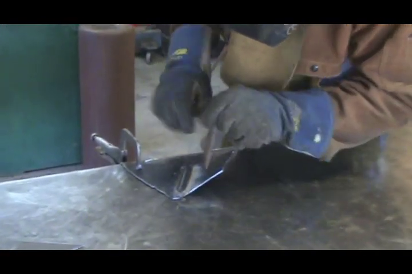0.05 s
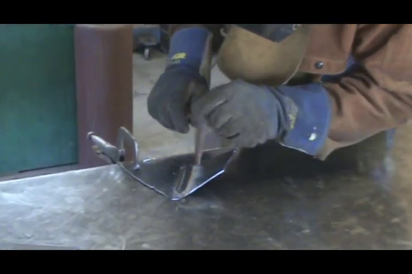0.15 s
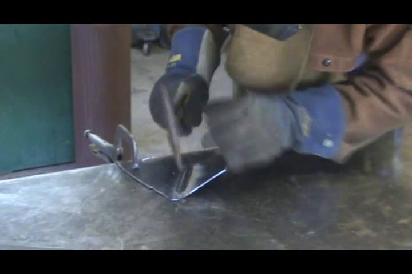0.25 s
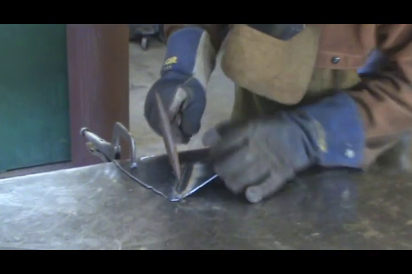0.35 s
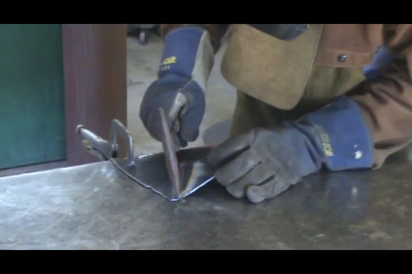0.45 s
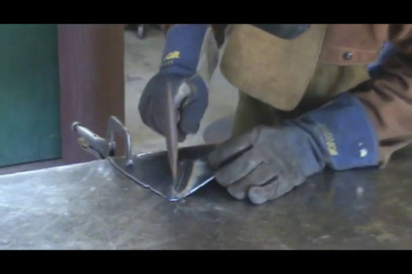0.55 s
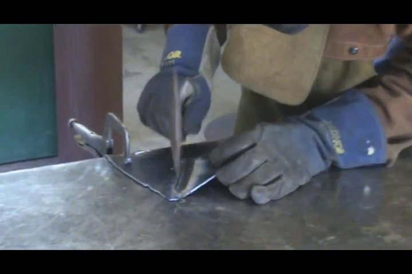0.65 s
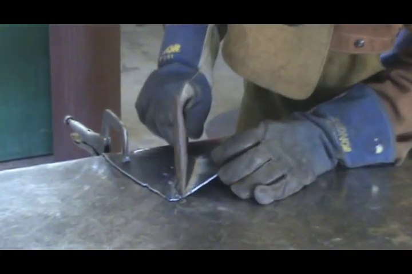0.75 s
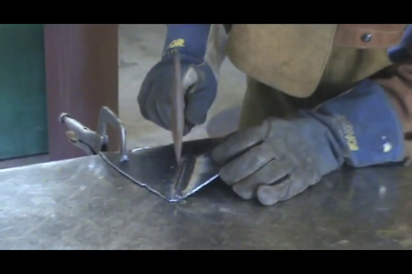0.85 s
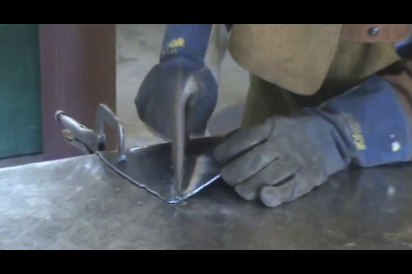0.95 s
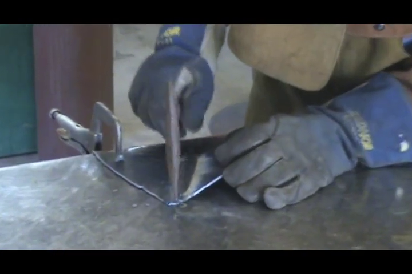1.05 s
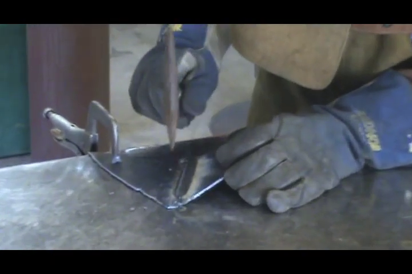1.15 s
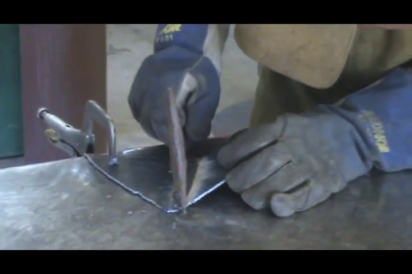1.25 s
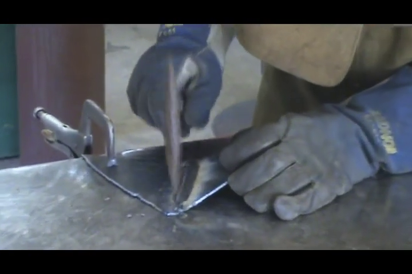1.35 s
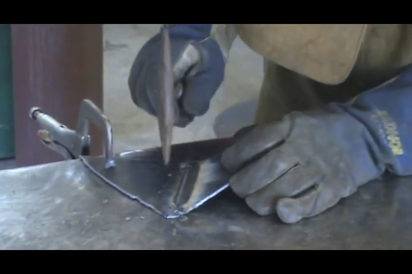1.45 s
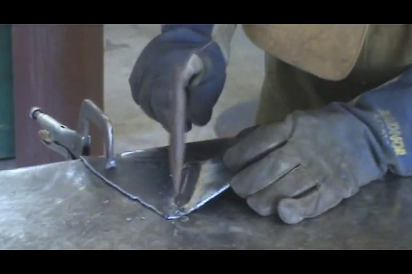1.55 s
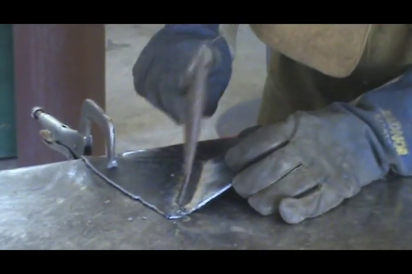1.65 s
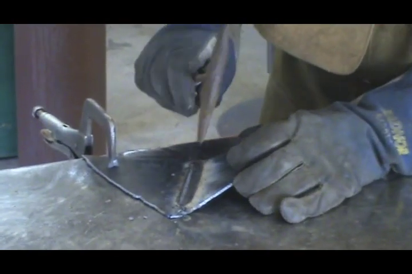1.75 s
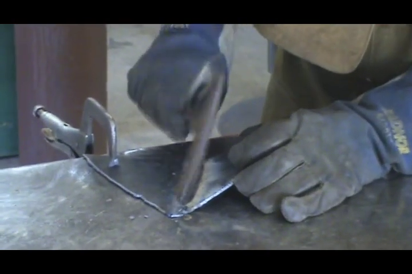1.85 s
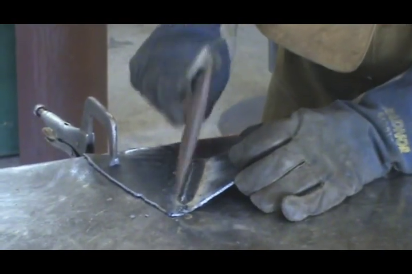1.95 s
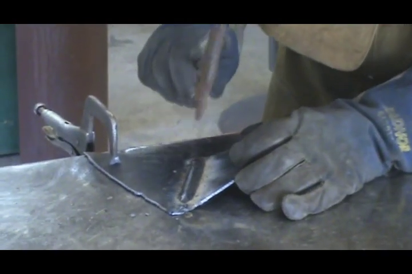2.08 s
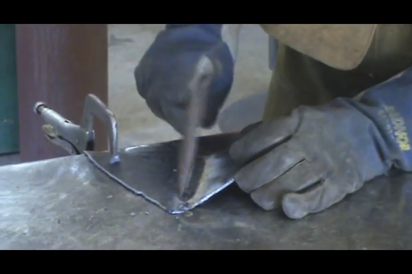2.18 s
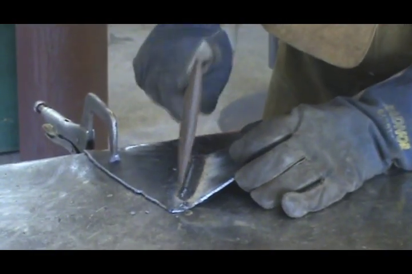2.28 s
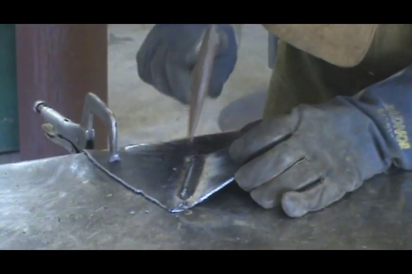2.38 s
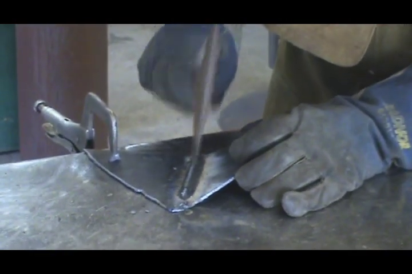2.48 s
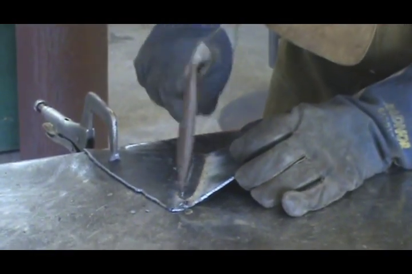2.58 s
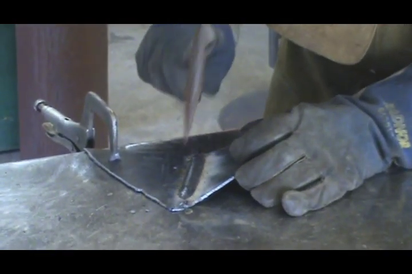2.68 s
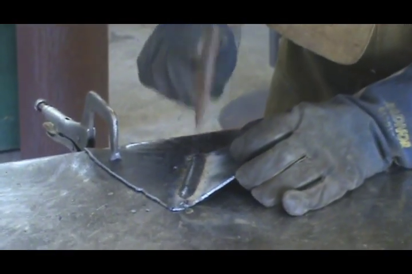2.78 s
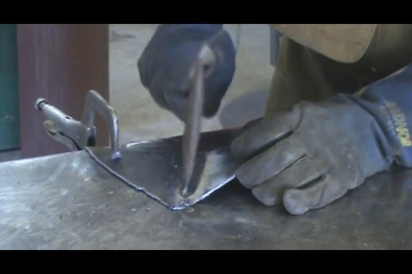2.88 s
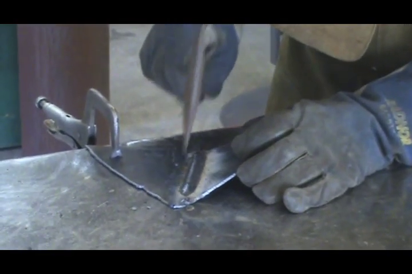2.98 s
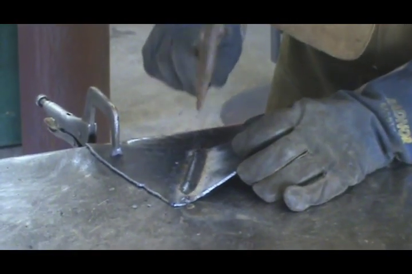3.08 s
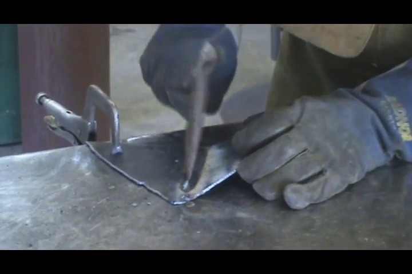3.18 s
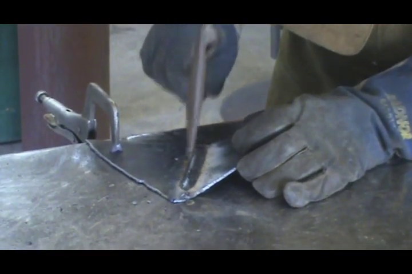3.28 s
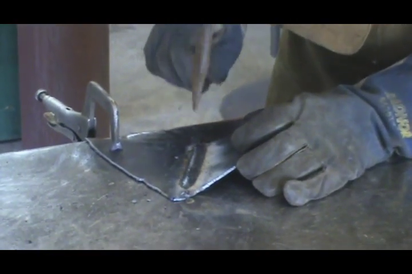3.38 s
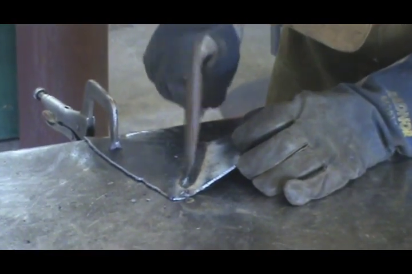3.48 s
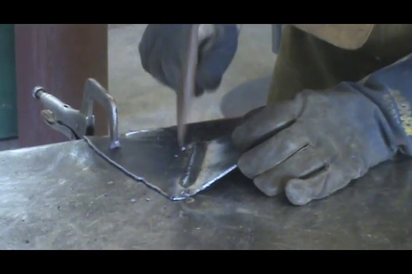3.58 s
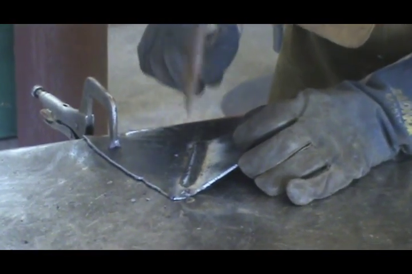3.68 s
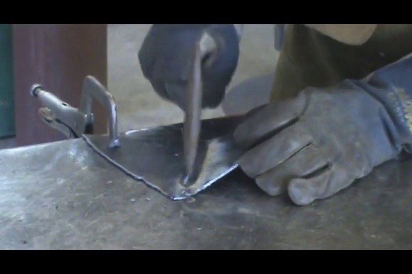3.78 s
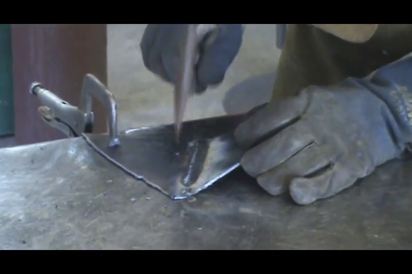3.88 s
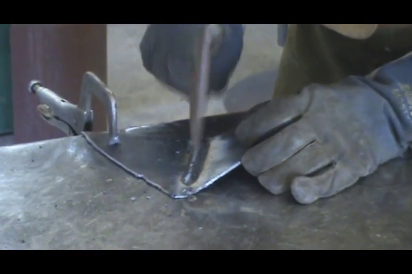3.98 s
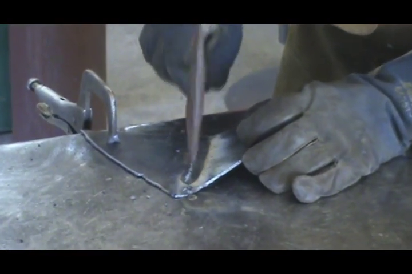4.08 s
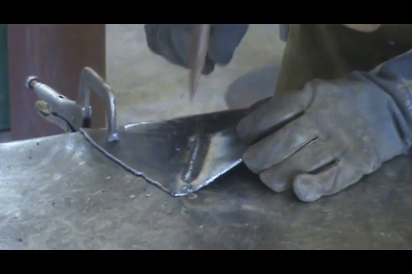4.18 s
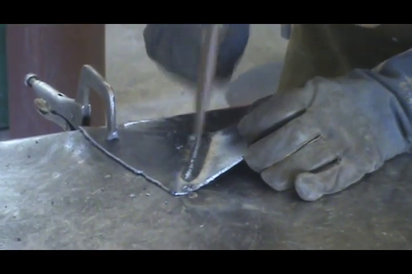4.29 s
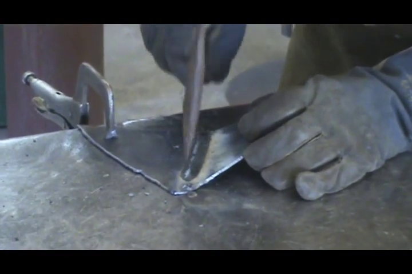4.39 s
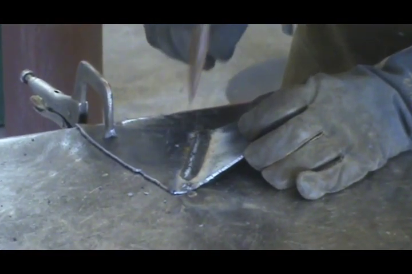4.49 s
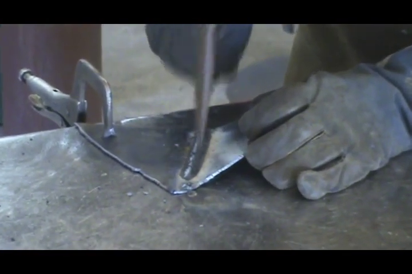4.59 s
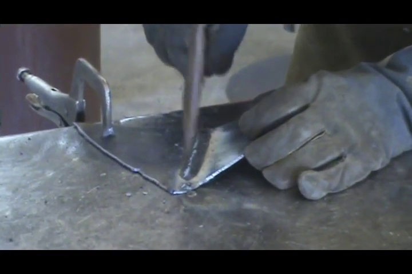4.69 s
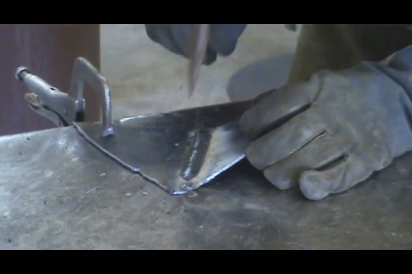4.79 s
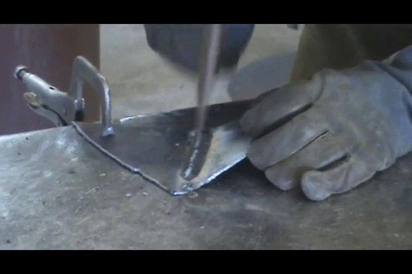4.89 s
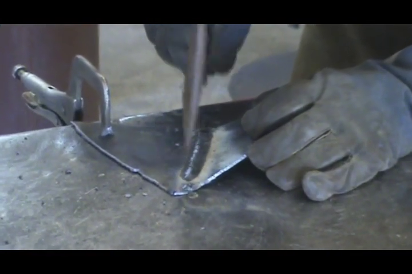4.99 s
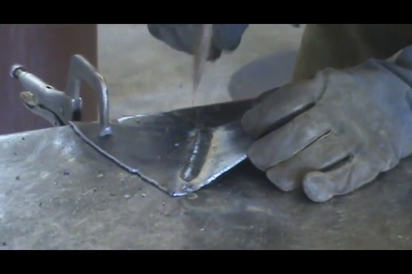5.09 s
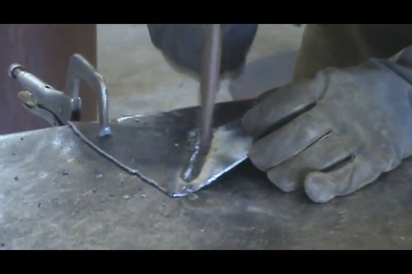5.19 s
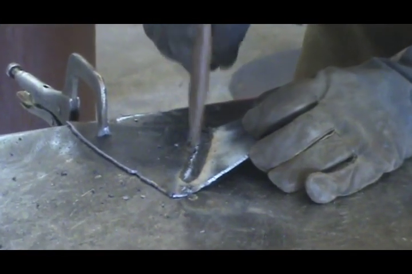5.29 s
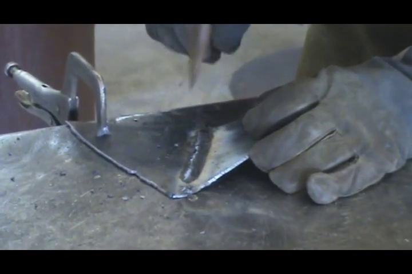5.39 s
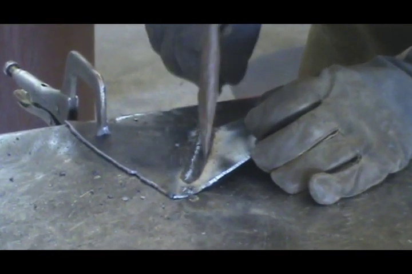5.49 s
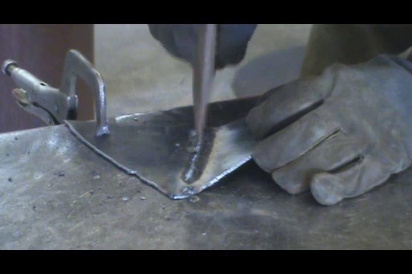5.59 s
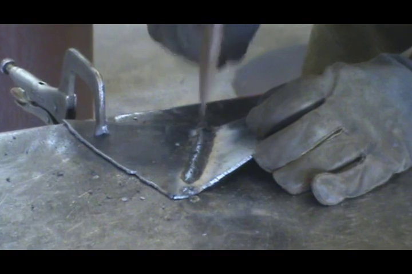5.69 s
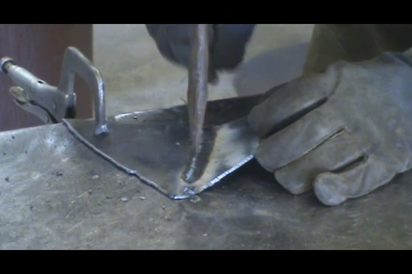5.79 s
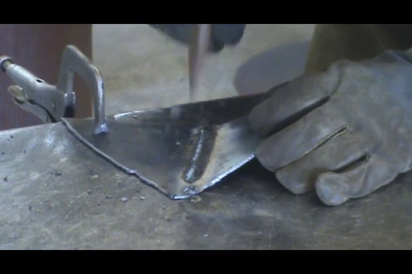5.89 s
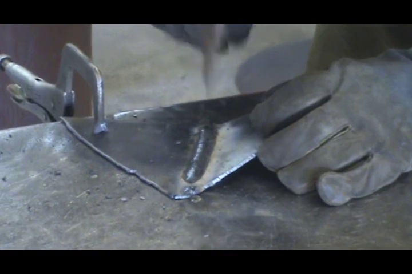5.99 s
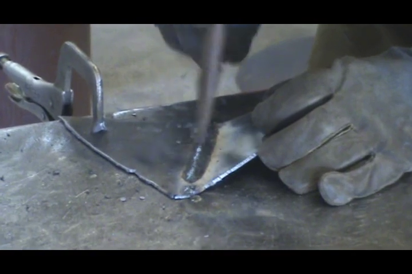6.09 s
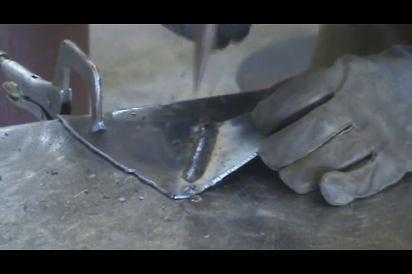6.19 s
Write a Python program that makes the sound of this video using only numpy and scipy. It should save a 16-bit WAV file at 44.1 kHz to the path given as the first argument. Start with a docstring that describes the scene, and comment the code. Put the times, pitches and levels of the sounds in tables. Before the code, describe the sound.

Hard, bright hammer blows clank about three times a second on a loose steel plate, each ringing on through a workshop bench.

```python
"""Steel rings faintly over workshop air, gloves and hammer shuffle into place, then a hammer chips slag off a weld.
The steel plate lies loose on a steel workbench, held by hand. Each blow is a short clank of dying sines and crackling
noise; plate, bench and workshop ring on as noise shaped band by band plus clear dying sines. Handling is small knocks
and grainy noise slides. A limiter ducks at loud clanks and recovers steadily, so the ringing swells after the blow."""
import sys
import numpy as np
from scipy import signal
from scipy.fft import rfft, irfft
from scipy.io import wavfile
from scipy.ndimage import uniform_filter1d

SR = 44100
rng = np.random.default_rng(int(sys.argv[2]) if len(sys.argv) > 2 else 0)


def unload_wav(signal):
    """Save mono or channel-first audio to the path in sys.argv[1] as 16-bit WAV at rate SR, clipped to [-1, 1]."""
    wavfile.write(
        sys.argv[1],
        SR,
        np.round(np.clip(np.atleast_2d(signal).T, -1, 1) * 32767).astype(np.int16),
    )


N = 275625


def amp(db):
    """Turns decibels into gain."""
    return 10 ** (np.asarray(db) / 20)


def unit(x):
    """Scales a signal to rms 1."""
    return x / np.sqrt(np.mean(x ** 2) + 1e-20)


def read(points, hz):
    """Reads a table along a log-frequency axis."""
    f, value = np.transpose(points)
    return np.interp(np.log(hz + 1), np.log(f + 1), value)


def add(mix, start_s, sound):
    """Mixes a sound in at its start time."""
    part = mix[max(round(start_s * SR), 0):][:len(sound)]
    part += sound[:len(part)]


def noise(length):
    """Makes white noise."""
    return rng.standard_normal(length)


def colour(x, spectrum):
    """Gives white noise a spectrum, at rms 1."""
    hz = np.fft.rfftfreq(len(x), 1 / SR)
    return unit(irfft(rfft(x) * amp(read(spectrum, hz)), len(x)))


def wobble(length, size):
    """Makes a smooth random curve of rms 1 by averaging noise over size samples."""
    return unit(uniform_filter1d(noise(length), size=size))


def tone(hz, bass_db, treble_db, bass_hz=1150, treble_hz=5000):
    """Two shelves: a blow cushioned by slag is dull, one on bare steel is bright."""
    bass = 1 / (1 + (hz / bass_hz) ** 4)
    treble = 1 - 1 / (1 + (hz / treble_hz) ** 4)
    return amp(bass_db * bass + treble_db * treble)


def modes(table, t, spot, bass_db, treble_db, scatter_db, detune, phase_spread):
    """Dying sines mixed by the spot that is struck; the holding hand changes level and tuning a little."""
    hz, tip_db, t60, gained_db = np.transpose(table)[:, :, None]
    size, shift, phase = rng.standard_normal((3, len(hz), 1))
    cycles = hz * (1 + detune * shift) * t + phase_spread * phase
    angle = np.float32(2 * np.pi * cycles)
    fade = np.exp(np.float32(-np.log(1000) / t60 * t))
    gain = amp(tip_db + spot * gained_db + scatter_db * size) * tone(hz, bass_db, treble_db)
    return (gain * (fade * np.sin(angle))).sum(0)


def bench_pattern():
    """The part of the response of bench and room that all blows share, as 0.75 s of noise."""
    return noise(SR * 3 // 4)


# Crowded modes of plate and bench heard through the workshop: [f/Hz, relative level/dB per Hz]
RING_SPECTRUM = [(60, -79), (170, -38), (280, -16), (450, -7), (920, 3), (1200, 1), (1500, -1), (2300, 1),
                 (4800, -4), (6000, -8), (8000, -13.5), (10800, -21.5), (12500, -31.5)]
# Time in which the crowded modes die away by 60 dB: [f/Hz, t60/s]
RING_DECAY = [(200, 0.45), (530, 0.43), (1000, 0.34), (1800, 0.38), (3700, 0.41), (7000, 0.36),
              (12000, 0.3)]
# Bands where the plate's modes bunch up or thin out: [centre f/Hz, width/Hz, level/dB]
MODE_BUNCHES = [(3950, 160, -3), (6100, 300, -3.5), (6800, 330, 4), (7380, 130, -6), (7620, 90, 4),
                (11720, 170, 5)]
# Build-up time constant (s) up to 1 kHz; above, shorter bending waves travel faster and build up sooner
SPREAD_S, SPREAD_SLOPE = 0.016, 0.83


def dense_ring(pattern, bass_db, treble_db):
    """Crowded modes as noise that builds and dies band by band; long waves repeat more between blows."""
    n = len(pattern)
    t, hz = np.arange(n) / SR, np.fft.rfftfreq(n, 1 / SR)
    alike = read([(700, .5), (3000, .3)], hz)
    mixed = alike * rfft(pattern) + np.sqrt(1 - alike ** 2) * rfft(noise(n))
    bunch_db = sum(db * np.exp(-((hz - centre) / width) ** 2) for centre, width, db in MODE_BUNCHES)
    # each blow favours other groups of modes
    favour_db = 2.0 * wobble(len(hz), size=50)
    dense = colour(irfft(mixed * amp(bunch_db + favour_db), n), RING_SPECTRUM)

    band_hz, age, bands = signal.stft(dense, SR, nperseg=512)
    t60 = read(RING_DECAY, band_hz)[:, None]
    spread_s = SPREAD_S * (1000 / np.maximum(band_hz, 1000)) ** SPREAD_SLOPE
    fade = np.exp(-np.log(1000) * age / t60)
    build = 1 - np.exp(-age / spread_s[:, None])
    bands = bands * tone(band_hz, bass_db, treble_db)[:, None] * fade * build
    # the loose plate chatters on the bench while it still swings hard
    chatter = amp(1.3 * wobble(n, size=220) * np.exp(-t / .15))
    return signal.istft(bands, SR)[1][:n] * chatter


# Clear modes of the bench top: [f/Hz, level at the plate's tip/dB, t60/s, level gained at mid-weld/dB]
BENCH_MODES = [(370, -22, .7, 0), (447, -19, .5, 0), (478, -19, 1.7, -9), (513, -13, .5, 0),
               (592, -18, .5, 0), (738, -10, .42, 0), (900, 0, .3, -1), (921, 6.5, .33, 0),
               (957, 1, .31, -3), (993, -1, .36, -3), (1029, -6, .45, 0), (1109, -8, .45, 0),
               (1210, -4, .45, -4), (1332, -2, .5, -7), (1643, -9, .45, 0), (1826, -8, .4, 0),
               (1905, -10, .4, 3), (2090, -6, .4, -3), (2409, -8, .4, 0), (2509, -7, .45, 0),
               (2970, -4, .58, -6), (3526, -8, .38, 3), (4405, -9, .36, 4), (4580, -10, .34, 4),
               (6933, -11, .38, 0), (7640, -15, .33, 4), (8855, -20, .35, 0)]


def ring(pattern, bass_db, treble_db, spot=0, dense_db=3, clear_db=-10.5, build_s=0.019):
    """Plate, bench and room ring on: a dense wash of crowded modes with clear bench tones in it."""
    t = np.arange(len(pattern)) / SR
    dense = dense_ring(pattern, bass_db, treble_db)
    clear = modes(BENCH_MODES, t, spot, bass_db, treble_db, scatter_db=2.5, detune=.002, phase_spread=.12)
    build = 1 - np.exp(-t / build_s)
    return amp(dense_db) * dense + amp(clear_db) * clear * build


# Workshop air: [f/Hz, relative level/dB per Hz]
AIR_SPECTRUM = [(25, -19), (90, -28), (200, 0), (450, 2), (900, 1), (2200, -5), (5000, -10.5),
                (12000, -17.5)]


def workshop_air(level_db=-48):
    """The air of the workshop: steady coloured noise."""
    return amp(level_db) * colour(noise(N), AIR_SPECTRUM)


# Hammer head and plate at the contact: [f/Hz, level at the plate's tip/dB, t60/s, level gained at mid-weld/dB]
CLANK_MODES = [(70, -58, 0.05, 21), (746, -9.5, 0.067, -4), (1071, -1, 0.06, -2.5), (1297, -2.5, 0.064, -2),
               (1881, 0, 0.039, 6.5), (2020, 4, 0.023, -0.5), (2330, -0.5, 0.038, 4.5),
               (3512, -6.5, 0.045, 5.5), (4590, -13, 0.093, 9), (6630, -19, 0.071, 12),
               (7700, -12.5, 0.081, 6.5), (8050, -1, 0.061, -4.5), (9460, -18, 0.031, 11.5),
               (11500, -28, 0.032, 12)]
# Slag cracking under the point: [f/Hz, relative level/dB per Hz]
CRACK_SPECTRUM = [(30, -61), (300, -31), (700, -22), (1500, -3), (2200, 1), (5000, 1.5), (6000, -4.5),
                  (8200, -8), (10500, -11.5), (12500, -22.5)]


def clank(treble_db, spot=0, modes_db=-6, crack_db=-2, crack_s=0.0061, rise_s=0.00073):
    """Direct sound of the contact: quickly damped steel modes and a burst of cracking slag."""
    t = np.arange(SR // 10) / SR
    steel = modes(CLANK_MODES, t, spot, 0, treble_db, scatter_db=1.5, detune=.003, phase_spread=1)
    grit = colour(noise(len(t)), CRACK_SPECTRUM)
    shelf = tone(np.fft.rfftfreq(len(t), 1 / SR), 0, treble_db)
    grit = irfft(rfft(grit) * shelf, len(t)) * np.exp(-t / crack_s)
    rise = 1 - np.exp(-t / rise_s)
    return (amp(modes_db) * steel + amp(crack_db) * grit) * rise


# Light knocks as the tool is taken up: [t/s, level/dB, treble level/dB, ring level over the knock/dB]
TOOL_KNOCKS = [(.091, -23.5, -9, -25), (.175, -28, -5, -28), (.586, -28, -20, -22)]


def handling(pattern, settle_db=-29, settle_ago_s=0.031, damping_s=0.0035):
    """The bench still rings from an earlier bump; small knocks follow as hand and hammer find their place."""
    out = np.zeros(N)
    bump = ring(pattern, bass_db=6, treble_db=-27, spot=1)
    add(out, 0, amp(settle_db) * bump[round(settle_ago_s * SR):])
    for start_s, db, treble_db, ring_db in TOOL_KNOCKS:
        tick = clank(treble_db)
        # the point stays on the steel and damps the knock
        damping = np.exp(-np.arange(len(tick)) / SR / damping_s)
        add(out, start_s, amp(db) * tick * damping)
        add(out, start_s, amp(db + ring_db) * ring(pattern, 0, treble_db))
    return out


# Hiss of a slide: [f/Hz, relative level/dB per Hz]
HISS_SPECTRUM = [(1000, -9), (2500, -1.5), (4500, -1), (7000, -4), (10000, -9), (12500, -13)]
# Duller rub of a slide: [f/Hz, relative level/dB per Hz]
BODY_SPECTRUM = [(80, -3), (220, 1.5), (450, -10), (1000, -7), (2000, -0.5), (3500, -9), (8000, -35)]
# Short slides of glove and hammer over the steel:
# [t of firmest pressure/s, swell/s, fade/s, hiss level/dB, body level over the hiss/dB]
HAND_SLIDES = [(0.199, 0.013, 0.056, -41.5, -1), (0.393, 0.035, 0.013, -42.5, -5),
               (0.623, 0.0049, 0.04, -45, -3), (0.705, 0.028, 0.045, -37, -15),
               (0.795, 0.028, 0.051, -53.5, 9.5)]


def sliding(grain_db=2.0):
    """Each slide swells as the hand presses and fades as it eases off: a grainy hiss and a duller rub."""
    t = np.arange(N) / SR
    hiss = colour(noise(N), HISS_SPECTRUM)
    body = colour(noise(N), BODY_SPECTRUM)
    catches = unit(amp(grain_db * wobble(N, size=180)))  # leather sticks and slips
    out = np.zeros(N)
    for peak_s, swell_s, fade_s, db, body_db in HAND_SLIDES:
        pressure = np.exp(-np.maximum((peak_s - t) / swell_s, (t - peak_s) / fade_s))
        out += amp(db) * pressure * (hiss + amp(body_db) * body)
    return out * catches


def crush(lead_s):
    """The point sinks through the slag for an instant before it meets steel: a rising scrap of noise."""
    rise = np.linspace(0, 1, max(round(lead_s * SR), 16))
    return colour(noise(len(rise)), RING_SPECTRUM) * rise


# Hammer blows: [t/s, force level/dB, clank level over the force/dB, contact brightness/dB]
HAMMER_BLOWS = [(0.9285, 2.5, 0.7, 6), (1.2013, 2, 1.5, -1), (1.4747, -4.5, 0.8, 4),
                (1.7961, -19.5, 5.5, -8.5), (2.0879, -1.5, 2, 7), (2.407, -1.5, 2, 1), (2.7555, 0, -1, 3),
                (3.0736, 0.8, -4, 6), (3.3982, -10, 1.5, -3.5), (3.6991, -0.7, -1.5, 6.5),
                (3.9849, -5, -1.4, 4), (4.2441, -4, -2, 8.5), (4.543, -6, 0.5, 1), (4.8365, -5.5, -1.5, 4),
                (5.1464, -3, -1, 0), (5.4302, -17.5, -0.5, -0.5), (5.7086, -11.5, -1, 4),
                (5.9631, -3, 0, 5.5)]
# The point works its way up the weld: [t/s, distance from the tip (0 = tip, 1 = mid-weld)]
WELD_SPOT = [(1.5, 0.11), (3, 0.68), (6, 0.75)]
# Paths of the clank, direct and off nearby steel: [delay t/s, level/dB]
CLANK_PATHS = [(0, -1), (.0054, -17.5)]
# The loose plate slaps back on the bench after some blows: [t/s, level/dB]
PLATE_SLAPS = [(3.12, -2), (3.741, 1.5), (4.868, -13), (5.188, -2.5), (5.998, -1)]
# Soft blows mostly stir the long waves: ring bass at mid-weld and 0 dB force (dB), its fall per dB of force
RING_BASS_DB, BASS_FALL = -2.13, 0.47
TIP_BASS_DB = 2  # the plate's free tip gives more bass than the weld further up
# The ring takes over a share of the contact brightness
RING_TREBLE_DB, BRIGHT_SHARE = 1.43, 0.29


def hammering(pattern, contact_db=12.5, crush_db=-19, lead_s=0.0026):
    """Each blow crushes slag, clanks on the steel and sets the bench ringing; the plate slaps back at times."""
    out = np.zeros(N)
    for start_s, force_db, clank_db, bright_db in HAMMER_BLOWS:
        add(out, start_s - lead_s, amp(force_db + crush_db) * crush(lead_s))
        spot = np.interp(start_s, *np.transpose(WELD_SPOT))
        hit = amp(force_db + clank_db + contact_db) * clank(bright_db, spot)
        for delay_s, db in CLANK_PATHS:
            add(out, start_s + delay_s, amp(db) * hit)
        bass_db = RING_BASS_DB - BASS_FALL * force_db + TIP_BASS_DB * (1 - spot)
        treble_db = RING_TREBLE_DB + BRIGHT_SHARE * bright_db
        add(out, start_s, amp(force_db) * ring(pattern, bass_db, treble_db, spot))
    for start_s, db in PLATE_SLAPS:
        add(out, start_s, amp(db) * clank(treble_db=1.0, spot=0.95))
    return out


def scene():
    """Handling, air, slides and blows in one mono mix, the same in both channels."""
    pattern = bench_pattern()
    mono = handling(pattern) + workshop_air() + sliding() + hammering(pattern)
    return np.array([mono, mono])


def band_limit(x, edge_hz=12500):
    """Steep low-pass that takes off the top of the treble."""
    low_pass = signal.firwin(301, edge_hz, window=("kaiser", 8), fs=SR)
    return signal.oaconvolve(x, low_pass[None], "same")


def record(dry, threshold_db=-7.5, release_db_per_s=215):
    """A limiter clamps within milliseconds and recovers steadily; peaks that slip through are rounded off."""
    sound = band_limit(dry)
    power = uniform_filter1d((sound ** 2).mean(0), size=61)
    power_db = 10 * np.log10(abs(power) + 1e-12)
    excess_db = np.maximum(power_db - threshold_db, 0)
    # a running maximum on a rising ramp lets the duck go at a constant rate
    recovery = release_db_per_s * np.arange(N) / SR
    duck_db = np.maximum.accumulate(excess_db + recovery) - recovery
    limited = sound * amp(-uniform_filter1d(duck_db, size=41))
    rounded = limited / (1 + (limited / .84) ** 8) ** (1 / 8)
    return band_limit(rounded)


dry = scene()
out = record(dry)
unload_wav(out)
```